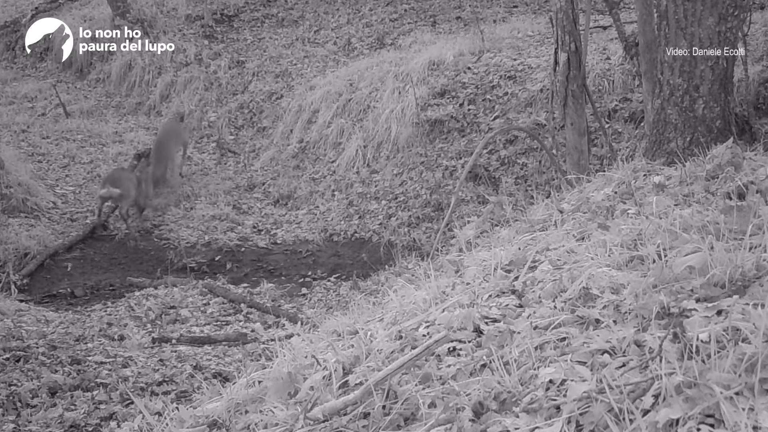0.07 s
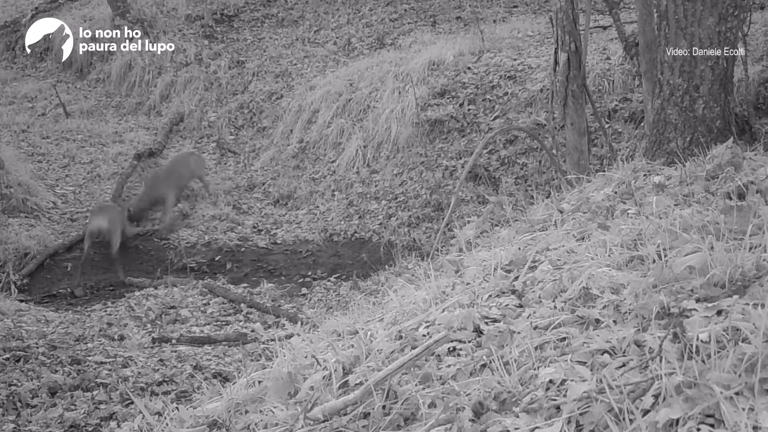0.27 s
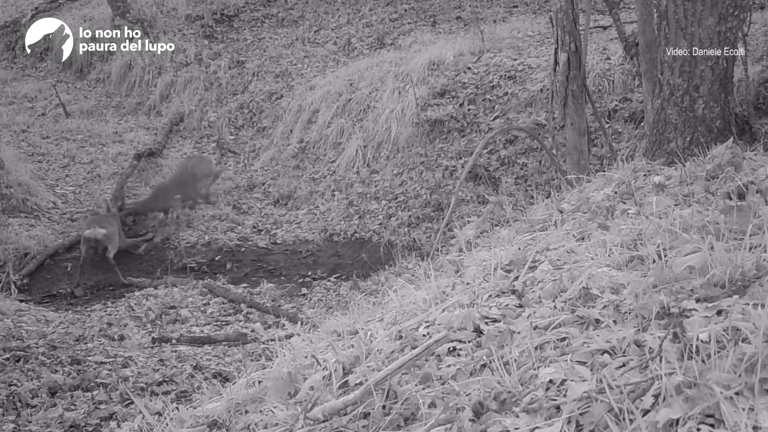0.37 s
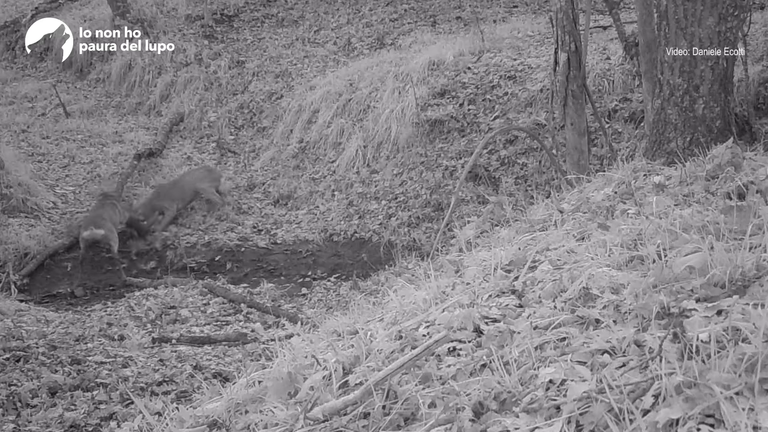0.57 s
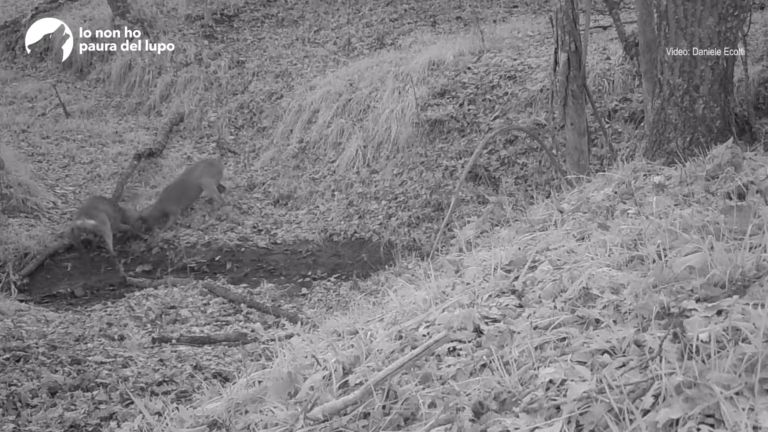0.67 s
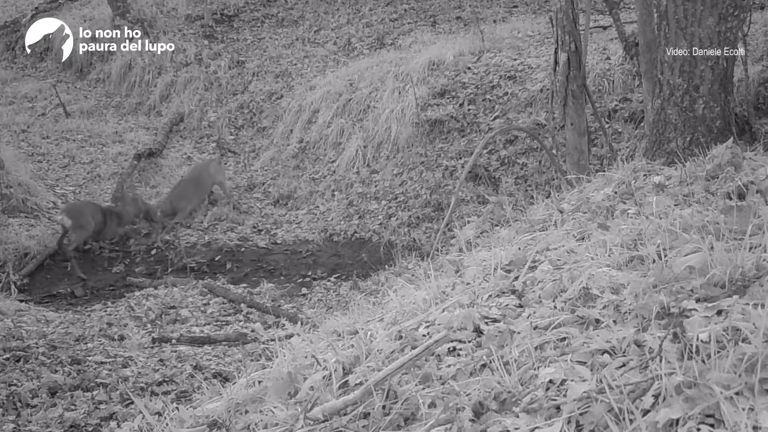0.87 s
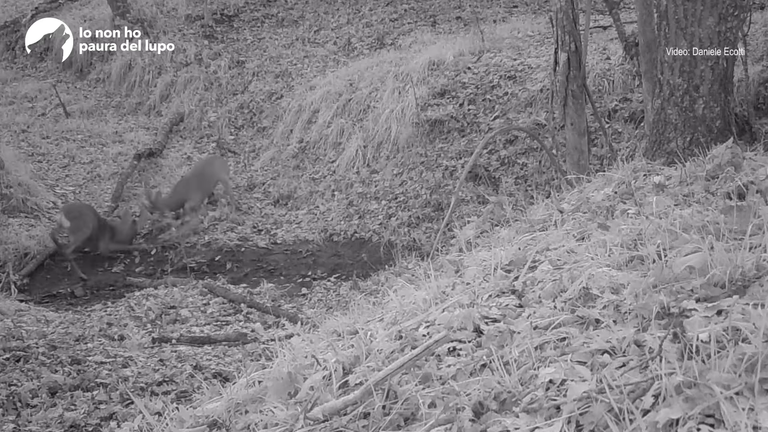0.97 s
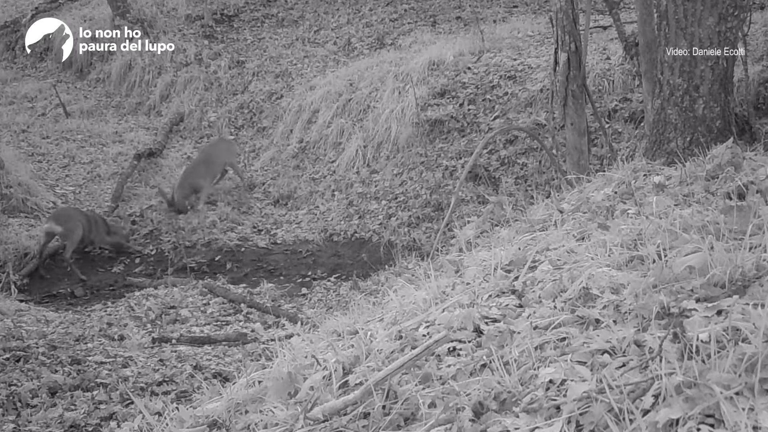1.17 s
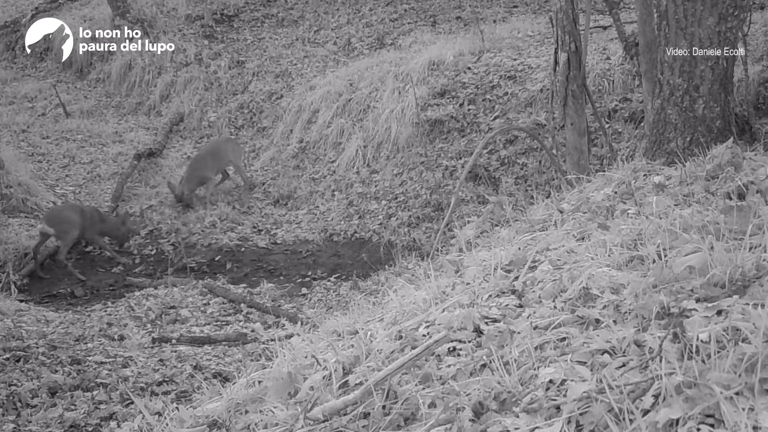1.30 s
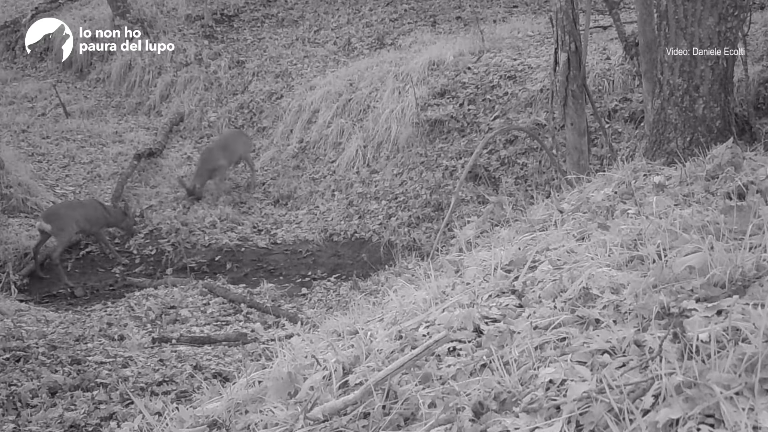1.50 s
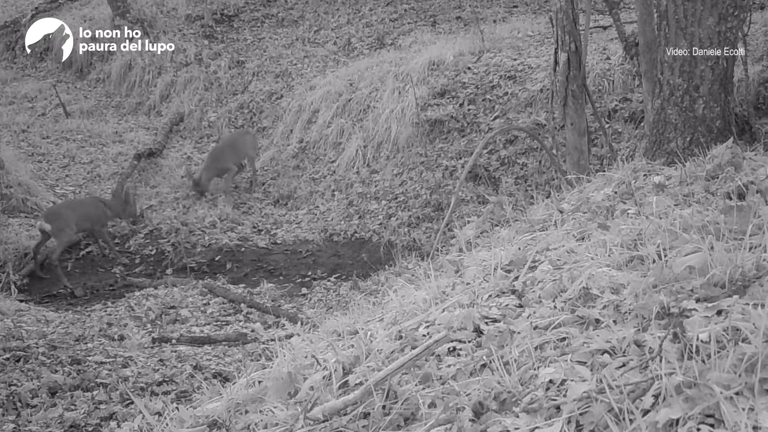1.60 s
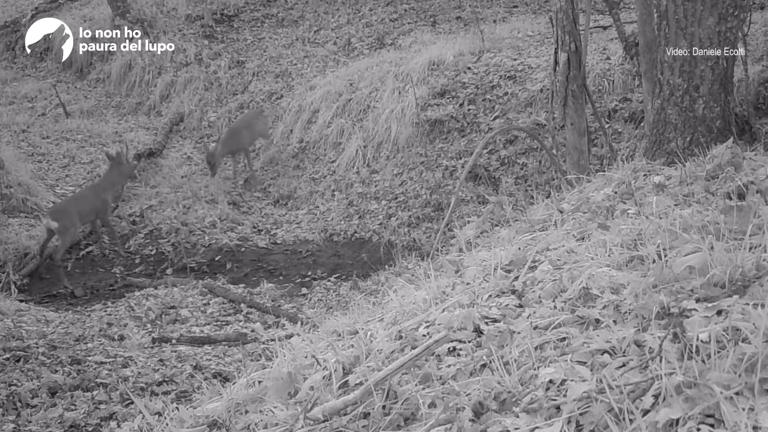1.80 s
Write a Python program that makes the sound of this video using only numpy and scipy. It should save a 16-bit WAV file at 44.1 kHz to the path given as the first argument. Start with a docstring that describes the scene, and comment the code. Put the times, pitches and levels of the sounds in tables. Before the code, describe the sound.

A scuffle between two deer in woodland: dry leaves crackle under dull hoofbeats while sharp cracks of antlers or twigs echo briefly, one overloading the microphone. The rustling then thins out, with a faint bird and constant hiss behind.

```python
"""Two deer scuffle at a muddy hollow in a wood.
Antlers or twigs crack and echo off trunks and slopes; hooves thud on soft ground and kick
through dry leaves, which snap in a dense crackle. A faint bird chirp and a far whistle
sit in a steady hiss. The loudest crack overloads the microphone."""
import sys
import numpy as np
from scipy import signal
from scipy.fft import rfft, irfft
from scipy.io import wavfile
from scipy.ndimage import uniform_filter1d

SR = 44100
rng = np.random.default_rng(int(sys.argv[2]) if len(sys.argv) > 2 else 0)


def output_pcm(signal):
    """Save a mono or channel-first signal as 16-bit PCM at the path in sys.argv[1].

    Samples are clipped to [-1, 1] before scaling.
    """
    pcm = np.clip(np.atleast_2d(signal).T, -1, 1) * 32767
    wavfile.write(sys.argv[1], SR, np.round(pcm).astype(np.int16))


N = 81585

# background hiss spectrum (frequency [Hz], relative density [dB])
HISS_SPECTRUM = [(12, -34), (20, -8.5), (36, 3.5), (67, -4.5), (149, -16), (208, -25.5), (428, -22),
                 (734, -31), (1030, -31.5), (1330, -29.5), (1550, -31.5), (2220, -27), (3350, -36),
                 (4330, -47.5), (5750, -35), (7830, -30.5), (9380, -39.5), (20600, -70)]
# trampling in leaves and mud (time [s], rustle [dB], ground rumble [dB])
TRAMPLING = [(0, -73, -46.5), (0.169, -61, -46.5), (0.199, -32.5, -28), (0.253, -45.5, -34),
             (.27, -35.5, -29), (.305, -32.5, -29), (.37, -33, -32), (0.466, -35, -35.5), (.51, -42, -40),
             (.59, -39.5, -38), (.625, -36, -35.5), (.74, -41, -43), (.81, -42.5, -36.5), (.92, -40, -42),
             (1.01, -51, -41), (1.085, -39.5, -45), (1.135, -38.5, -42), (1.29, -53, -47.5),
             (1.39, -43.5, -45.5), (1.52, -51, -46), (1.85, -55, -55)]
# kicks through leaves (time [s], level [dB], rise [s], decay [s], relative treble [dB])
LEAF_KICKS = [(.116, -32.5, 0.0043, 0.013, -4), (.178, -35.5, 0.0064, 0.012, 0.5),
              (0.261, -46, 0.003, 0.021, 13), (0.446, -35, 0.011, .01, -1), (0.485, -33, 0.001, 0.0048, -5),
              (0.679, -36, 0.017, 0.016, -1.5), (0.818, -35.5, 0.016, 0.022, -18),
              (.870, -29, 0.0017, 0.02, -20), (0.936, -29, 0.024, 0.014, -1.5),
              (1.2, -42.5, 0.023, 0.024, -3.5), (1.33, -43.5, .001, 0.016, 4.5),
              (1.34, -34.5, 0.01, 0.018, -0.5), (1.577, -41, 0.022, 0.037, 3),
              (1.668, -37, 0.0035, 0.029, 0), (1.73, -45, 0.0064, 0.0075, 3.5)]
# leaf body, leaf treble and ground rumble spectra (frequency [Hz], relative density [dB])
LEAF_BODY_SPECTRUM = [(200, 4), (700, -12.5), (1200, -8), (2050, 1.5), (2550, 1), (3200, -2), (3750, -10),
                      (4300, -22), (6000, -21.5)]
LEAF_TREBLE_SPECTRUM = [(3000, -30.5), (4600, -22.5), (5600, -7.5), (6500, -2.5), (7900, 1.5), (8600, -6.5),
                        (9400, -11.5), (10500, -13.5)]
GROUND_SPECTRUM = [(20, -1.5), (60, -2), (130, 4), (280, -1), (480, -7.5), (700, -21), (1500, -23),
                   (4000, -77)]
# falling bird chirp (time [s], pitch [Hz])
CHIRP_PATH = [(.06, 6550), (.066, 5750), (.085, 4700), (.118, 3720)]
# hoof thuds (time [s], level [dB], pitch [Hz], swell [s])
HOOF_THUDS = [(0.121, -33.5, 342, 0.0054), (0.181, -26, 333, 0.0025), (0.23, -17.5, 106, 0.0063),
              (0.233, -22, 263, 0.0044), (0.261, -15, 251, 0.0069), (0.278, -23.5, 296, 0.0051),
              (.299, -23.5, 277, 0.0069), (0.459, -29, 108, 0.0099), (0.469, -25, 250, 0.0052),
              (0.484, -23.5, 370, 0.0016), (.605, -14.5, 239.7, 0.007), (0.6953, -20, 295, 0.0053),
              (0.7694, -29.5, 450, 0.0029), (.786, -25.5, 397, 0.0023), (0.7889, -15.5, 149, 0.0038),
              (0.806, -26.5, 206, 0.0043), (.871, -23.5, 282, 0.0013), (0.95, -23, 346, 0.0019),
              (1.029, -25, 234, 0.0065), (1.103, -18, 260, 0.00099), (1.181, -25.5, 221, 0.0029),
              (1.332, -31, 298, .002), (1.588, -39.5, 322, 0.0043), (1.671, -33, 410, 0.003)]
# crumbling soil spectrum (frequency [Hz], relative density [dB])
SOIL_SPECTRUM = [(120, -24), (300, 16), (480, 13), (620, 0.5), (850, -22), (2000, -43)]
# antler or twig cracks (time [s], knock [dB], knock pitch [Hz], knock width [oct], snap [dB],
# snap pitch [Hz], snap width [oct], decay [s], ring re knock [dB], gain at MID_HZ [dB])
CRACK_EVENTS = [(.186, -25, 2200, 0.36, -26.5, 7460, 0.2, 0.0034, -12, -13.5),
                (.2276, -11.5, 1980, 0.8, -6.5, 7150, 0.27, 0.0012, -7, -10),
                (.2345, -10.5, 2090, 0.19, -20.5, 6850, 0.38, 0.002, -17, 1),
                (.5997, -17.5, 2200, 0.54, -3, 7180, 0.2, 0.00093, -5, -11),
                (.6012, -4.5, 1930, 0.32, -7, 7300, 0.17, 0.0011, -8, -14),
                (.6031, -3.5, 2080, .62, -8.5, 6800, .28, 0.0012, 0, -5),
                (0.6043, -4, 2490, 0.62, -11.5, 7000, 0.41, .0018, -4, -9),
                (.6102, -12.5, 1900, 0.56, -12, 7350, 0.24, 0.002, 1.5, -9),
                (1.1035, -11, 2050, 1.5, -10, 6330, 0.39, .0012, -7.5, 5),
                (1.1194, -21.5, 2800, .35, -38, 7300, .3, 0.0012, -14, -10),
                (1.1578, -27.5, 2240, 0.39, -37, 7400, .22, 0.002, -14, -10)]
# modes of struck wood or antler (frequency [Hz], relative level [dB], T60 [s])
RING_MODES = [(1200, -24, 0.067), (1444, -10.5, 0.023), (1560, -26, 0.038), (2064, -11, 0.043),
              (2440, -20, .046), (2880, -25, .07), (3340, -19, 0.036), (3890, -19.5, 0.07)]

GRAINS_PER_S, GRAIN_SPREAD_DB, FLUTTER_DB = 1800, 2, 1.5
SNAPS_PER_S, SNAP_SPREAD_DB, SNAP_DECAY_CYCLES = 900, 3, 5
WHISTLE_HZ, WHISTLE_DB, WHISTLE_START_S, WHISTLE_LENGTH_S = 2180, -48, 1.39, .155
CLICK_GAIN, CRACK_TAIL_DB, CRACK_TAIL_S = 2.2, -25.5, 0.024
MID_HZ, MID_Q = 4260, 5  # between knock and snap
ECHO_DB, ECHO_T60_S, ECHOES_PER_S = -18.5, 0.44, 2000
MIC_CUTOFF_HZ, CLIP_LEVEL, BAND_LIMIT_HZ = 8990, 0.99, 16000


def amp(db):
    """Decibels to gain."""
    return 10 ** (np.asarray(db) / 20)


def unit_rms(x):
    """Scale to rms 1."""
    return x / np.sqrt(np.mean(x ** 2) + 1e-20)


def add(mix, start_s, sound):
    """Mix a sound in at start_s."""
    part = mix[max(round(start_s * SR), 0):][:len(sound)]
    part += sound[:len(part)]


def colour(x, spectrum):
    """Apply a spectrum; output at rms 1."""
    hz, db = np.transpose(spectrum)
    bins_hz = np.fft.rfftfreq(len(x), 1 / SR) + 1
    gain = amp(np.interp(np.log(bins_hz), np.log(hz), db))
    return unit_rms(irfft(rfft(x) * gain, len(x)))


def resonance(x, hz, width_oct, skirt_db=-28.5):
    """Broad causal resonance with shallow skirts; output at rms 1."""
    bins_hz = abs(np.fft.fftfreq(len(x), 1 / SR)) + 1
    detune = np.log2(bins_hz / hz) / width_oct
    log_gain = np.log(np.exp(-detune ** 2 / 2) + amp(skirt_db))
    response = np.exp(np.conj(signal.hilbert(log_gain)))  # minimum phase
    return unit_rms(np.fft.ifft(np.fft.fft(x) * response).real)


def impulses(per_s, spread_db, max_spreads):
    """Impulses of random time, size and sign."""
    sizes_db = spread_db * np.minimum(rng.exponential(1, N), max_spreads)
    return amp(sizes_db) * rng.choice([-1, 1], N) * (rng.random(N) < per_s / SR)


def note(hz, db):
    """Sine on a pitch curve, faded at both ends."""
    fade = signal.windows.tukey(len(hz), 0.14)
    return amp(db) * fade * np.sin(2 * np.pi * np.cumsum(hz) / SR)


def hiss(level_db=-38.5):
    """Steady hiss with a low rumble."""
    return amp(level_db) * colour(rng.standard_normal(N), HISS_SPECTRUM)


def crackle():
    """Breaking leaves: dense impulses in a noise wash, fluttering in level."""
    grains = unit_rms(impulses(GRAINS_PER_S, GRAIN_SPREAD_DB, max_spreads=4)) + rng.standard_normal(N)
    flutter = unit_rms(uniform_filter1d(uniform_filter1d(rng.standard_normal(N), size=300), size=300))
    return grains * amp(FLUTTER_DB * flutter)


def leaf_snaps():
    """Dry leaves snap singly, each ringing a few cycles at its own pitch."""
    out, t = np.zeros(N), np.arange(1024) / SR
    pitches_hz = np.linspace(1200, 9600, 24)
    snaps = impulses(SNAPS_PER_S, SNAP_SPREAD_DB, max_spreads=3)
    pitch_index = rng.integers(0, len(pitches_hz), N)
    for k, hz in enumerate(pitches_hz):
        tick = unit_rms(np.exp(-hz * t / SNAP_DECAY_CYCLES) * np.sin(2 * np.pi * hz * t))
        out += signal.oaconvolve(snaps * (pitch_index == k), tick)[:N]
    return unit_rms(out)


def trampling(snaps_db=-4, trample_treble_db=-2):
    """Trampling and single kicks crush leaves; the ground rumbles beneath."""
    t = np.arange(N) / SR
    times_s, rustle_db, ground_db = np.transpose(TRAMPLING)
    body_power = amp(np.interp(t, times_s, rustle_db)) ** 2
    treble_power = body_power * amp(trample_treble_db) ** 2
    for start_s, db, rise_s, decay_s, treble_db in LEAF_KICKS:
        attack = np.clip((t - start_s) / rise_s, 0, 1)
        envelope = amp(db) * attack * np.exp(-np.maximum(t - start_s - rise_s, 0) / decay_s)
        body_power += envelope ** 2
        treble_power += (envelope * amp(treble_db)) ** 2
    crunch = crackle() + amp(snaps_db) * leaf_snaps()
    body = np.sqrt(body_power) * colour(crunch, LEAF_BODY_SPECTRUM)
    treble = np.sqrt(treble_power) * colour(crunch, LEAF_TREBLE_SPECTRUM)
    rumble = amp(np.interp(t, times_s, ground_db)) * colour(crackle(), GROUND_SPECTRUM)
    return body + treble + rumble


def bird_chirp(start_db=-54, end_db=-66):
    """Thin, quick chirp, fading as it falls."""
    out = np.zeros(N)
    times_s, hz = np.transpose(CHIRP_PATH)
    fall_hz = np.interp(np.arange(times_s[0], times_s[-1], 1 / SR), times_s, hz)
    add(out, times_s[0], note(fall_hz, np.linspace(start_db, end_db, len(fall_hz))))
    return out


def hooves(grit_db=-12):
    """Each hoof swings soft ground for a few cycles and crumbles some soil."""
    out, t = np.zeros(N), np.arange(4096) / SR
    for start_s, db, hz, swell_s in HOOF_THUDS:
        envelope = (t / swell_s * np.exp(1 - t / swell_s)) ** 2
        grit = amp(grit_db) * colour(rng.standard_normal(len(t)), SOIL_SPECTRUM)
        add(out, start_s, amp(db) * envelope * (np.sin(2 * np.pi * hz * t) + grit))
    return out


def crack(knock_db, knock_hz, knock_oct, snap_db, snap_hz, snap_oct, decay_s, ring_db, mid_db):
    """A click and tiny fractures excite a woody knock, a bright snap and a short ring."""
    t = np.arange(4096) / SR
    envelope = np.exp(-t / decay_s) + amp(CRACK_TAIL_DB) * np.exp(-t / CRACK_TAIL_S)
    burst = envelope * rng.standard_normal(len(t)) + CLICK_GAIN * (t == 0)
    envelope_rms = np.sqrt(np.mean(envelope ** 2))
    knock = envelope_rms * resonance(burst, knock_hz, knock_oct)
    snap = envelope_rms * resonance(burst, snap_hz, snap_oct)
    ring = sum(amp(ring_db + db - 60 * t / t60_s) * np.sin(2 * np.pi * hz * t)
               for hz, db, t60_s in RING_MODES)
    sound = amp(knock_db) * (knock + ring) + amp(snap_db) * snap
    mid_band = signal.lfilter(*signal.iirpeak(MID_HZ, MID_Q, fs=SR), sound)
    return sound + (amp(mid_db) - 1) * mid_band


def cracks():
    """Antlers or twigs crack; the loudest splinters in several quick breaks."""
    out = np.zeros(N)
    for start_s, *settings in CRACK_EVENTS:
        add(out, start_s, crack(*settings))
    return out


def echoes(x):
    """Scattered reflections from trunks and slopes."""
    t = np.arange(SR // 2) / SR
    taps = rng.standard_normal(len(t)) * (rng.random(len(t)) < ECHOES_PER_S / SR)
    taps *= amp(-60 * t / ECHO_T60_S)
    return amp(ECHO_DB) * signal.fftconvolve(x, taps / np.linalg.norm(taps))[:N]


def bird_whistle(pitch_waver=0.0036, flutter_db=2.5):
    """A far bird's soft note, wavering slightly in pitch and level."""
    out = np.zeros(N)
    waver = unit_rms(uniform_filter1d(rng.standard_normal(int(WHISTLE_LENGTH_S * SR)), size=1500))
    pitch_hz = WHISTLE_HZ * (1 + pitch_waver * waver)
    add(out, WHISTLE_START_S, note(pitch_hz, WHISTLE_DB + flutter_db * waver))
    return out


def scene():
    """Mono mix; only the cracks echo."""
    cracking = cracks()
    mix = cracking + hiss() + echoes(cracking) + hooves() + trampling() + bird_chirp() + bird_whistle()
    return mix[None]


def record(dry):
    """Microphone: treble roll-off, clipping on the loudest crack, band limit."""
    dull = signal.sosfilt(signal.butter(14, MIC_CUTOFF_HZ, fs=SR, output="sos"), dry)
    clipped = np.clip(dull, -CLIP_LEVEL, CLIP_LEVEL)
    band_limit = signal.firwin(511, BAND_LIMIT_HZ, window=("kaiser", 9), fs=SR)
    return signal.oaconvolve(clipped, band_limit[None], "same")


dry = scene()
out = record(dry)
output_pcm(out)
```